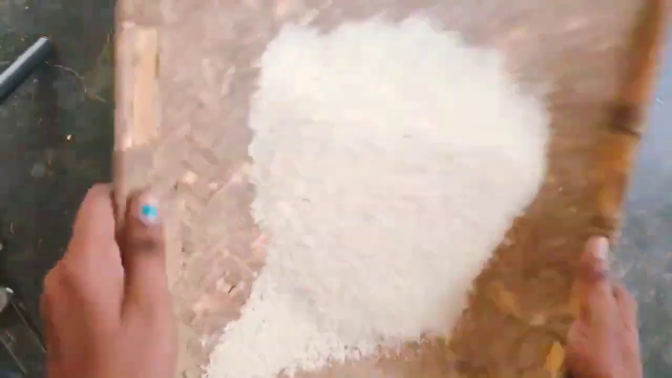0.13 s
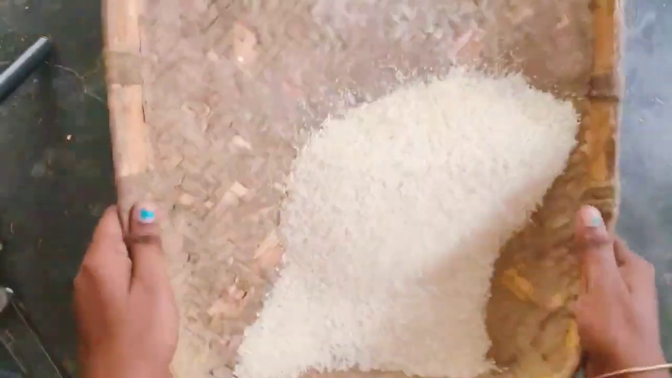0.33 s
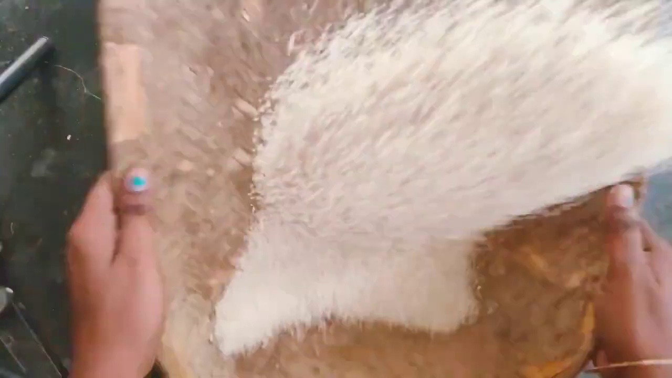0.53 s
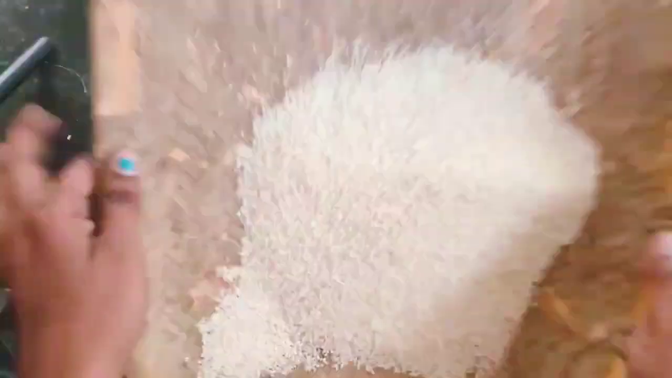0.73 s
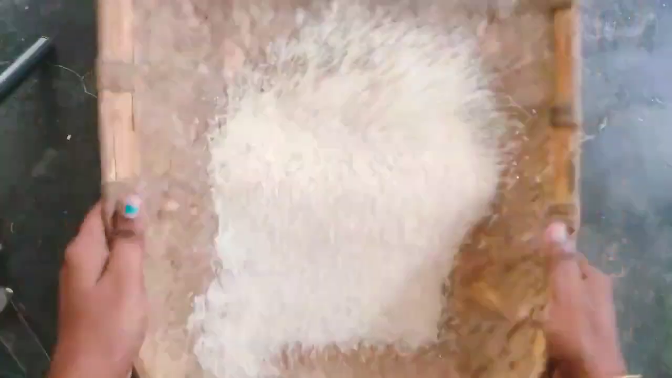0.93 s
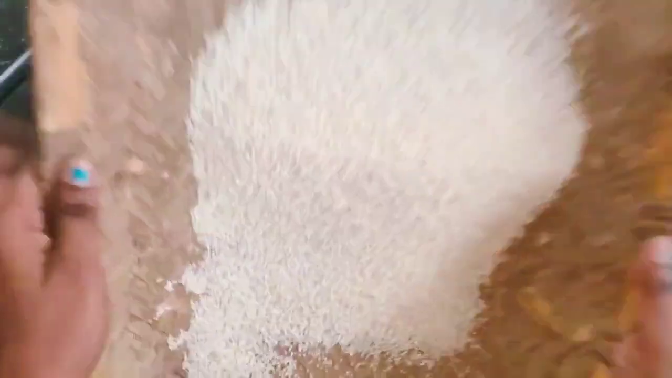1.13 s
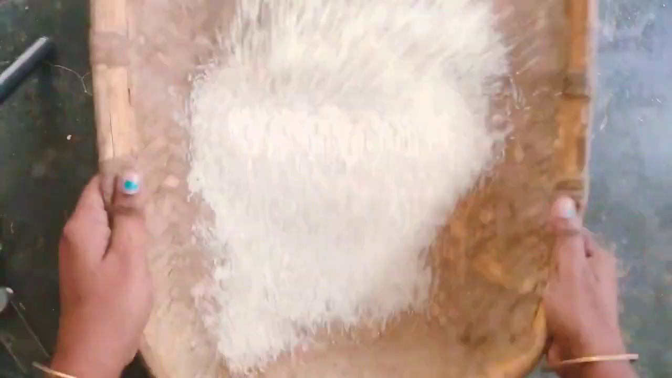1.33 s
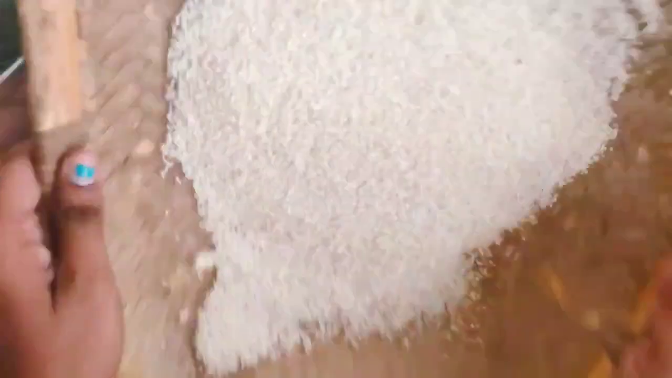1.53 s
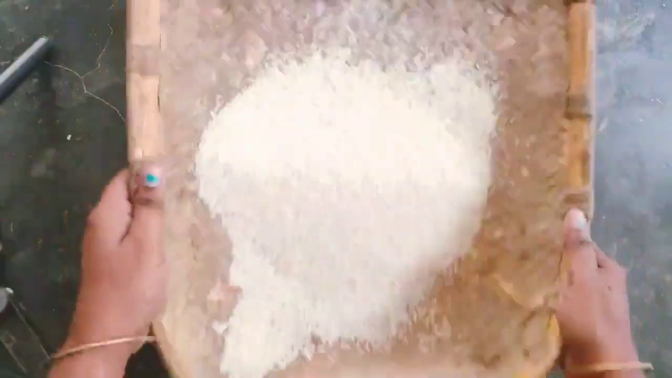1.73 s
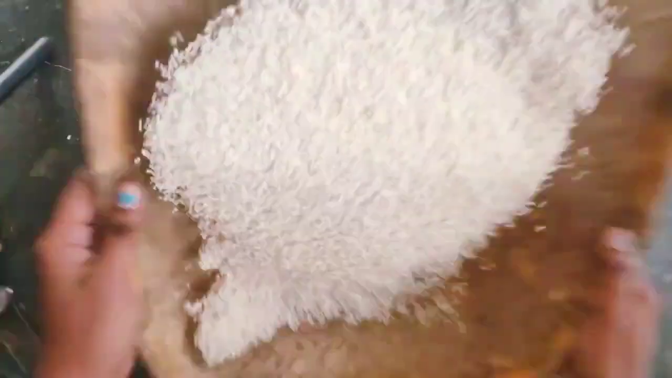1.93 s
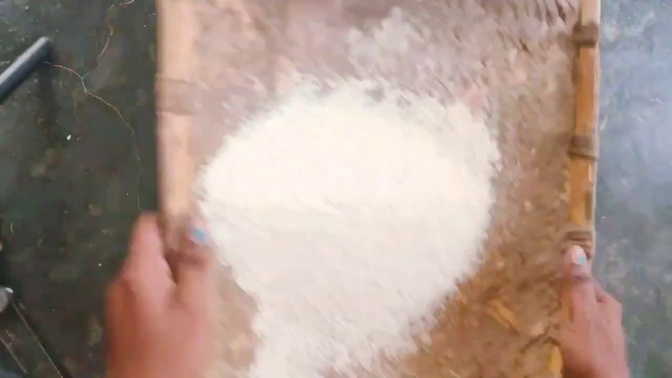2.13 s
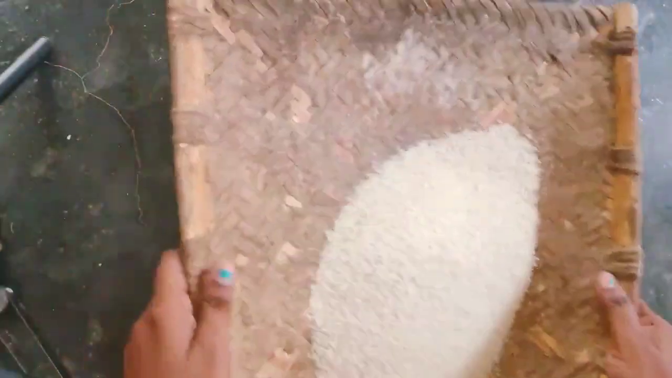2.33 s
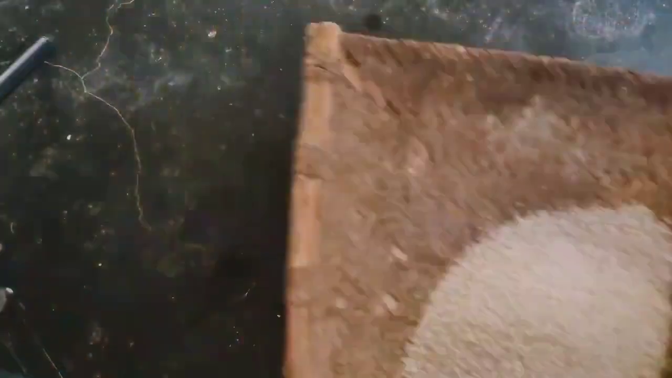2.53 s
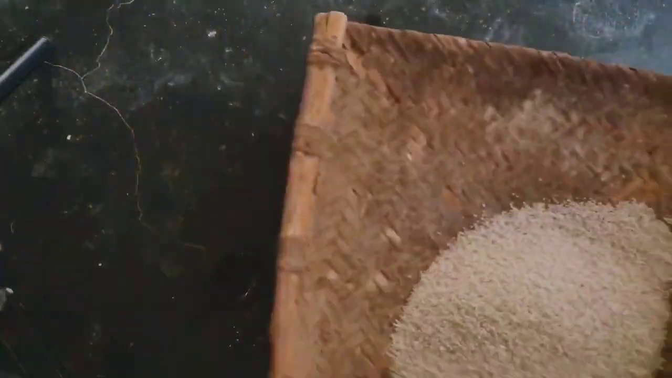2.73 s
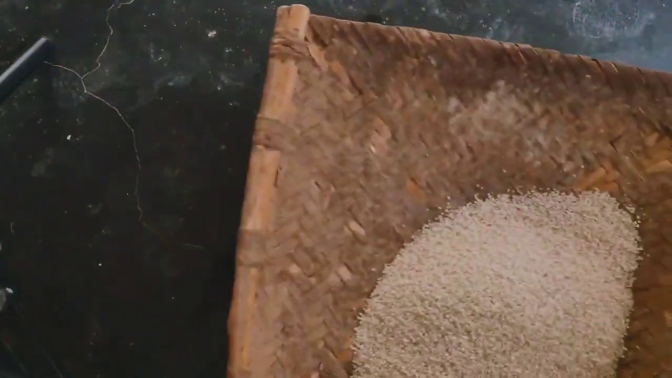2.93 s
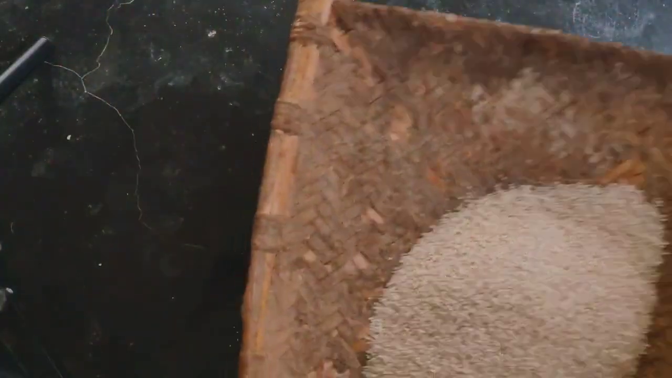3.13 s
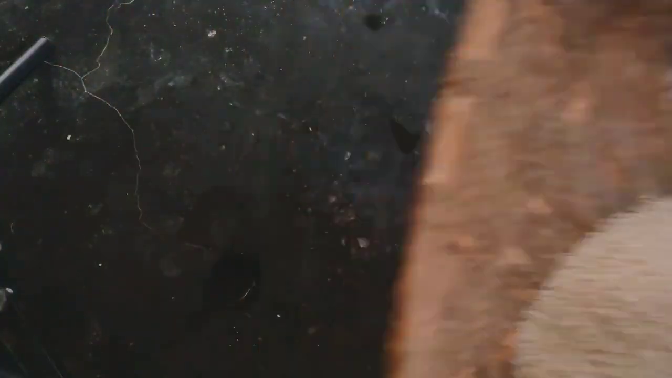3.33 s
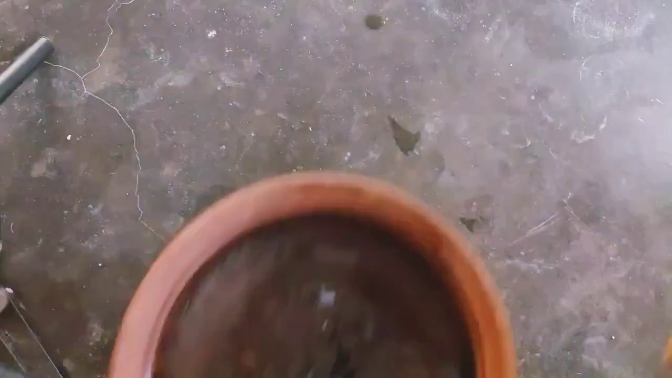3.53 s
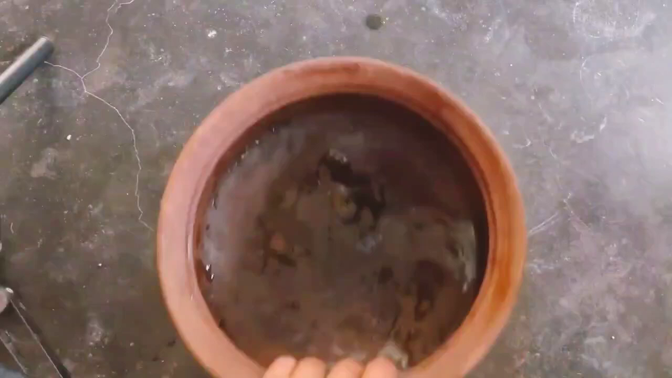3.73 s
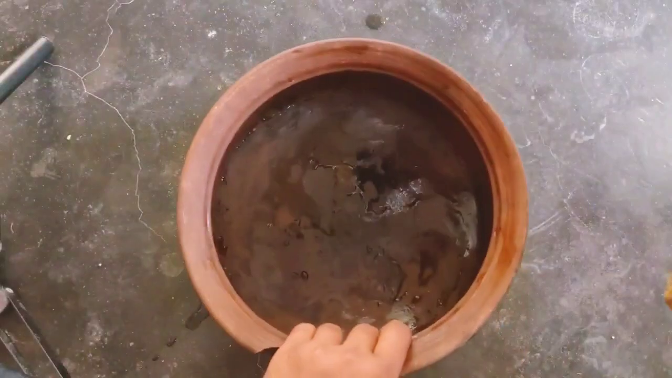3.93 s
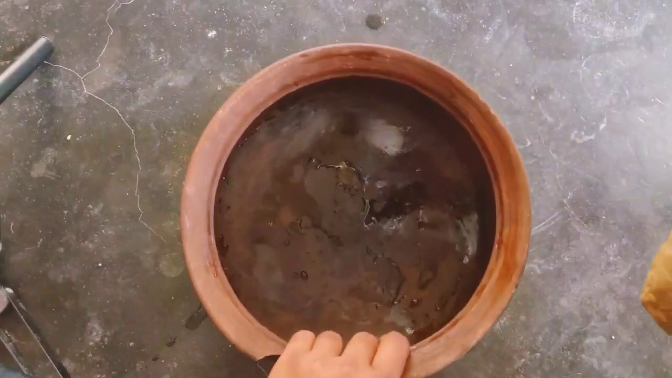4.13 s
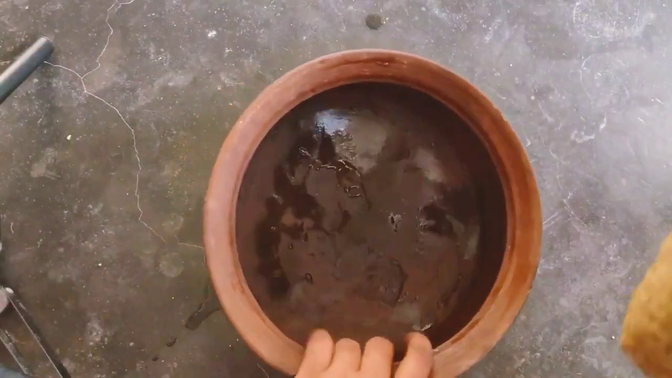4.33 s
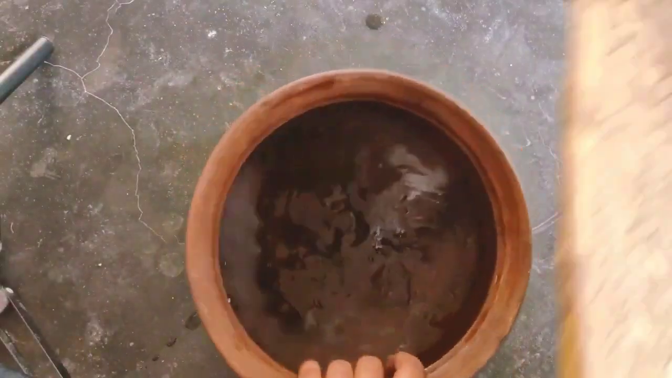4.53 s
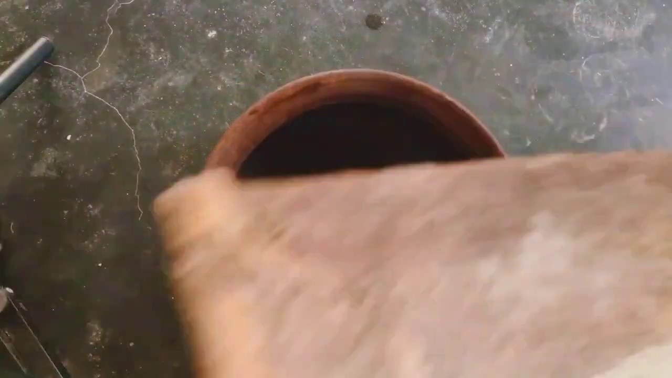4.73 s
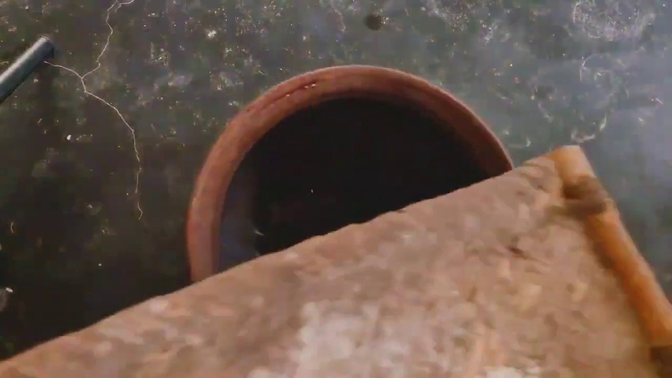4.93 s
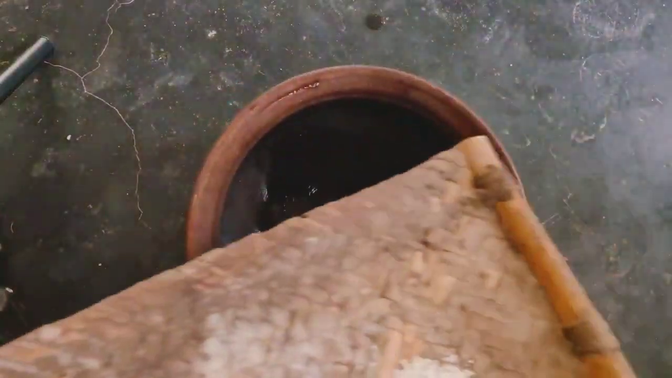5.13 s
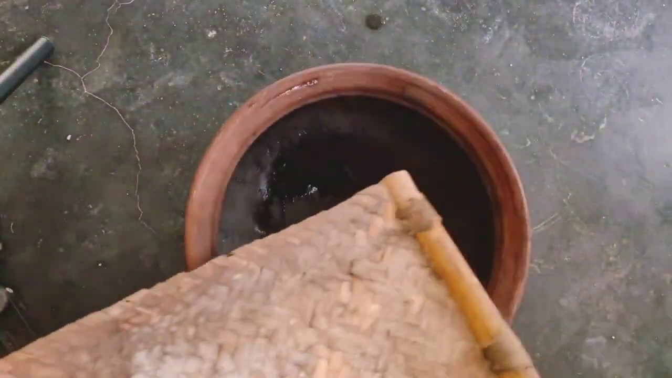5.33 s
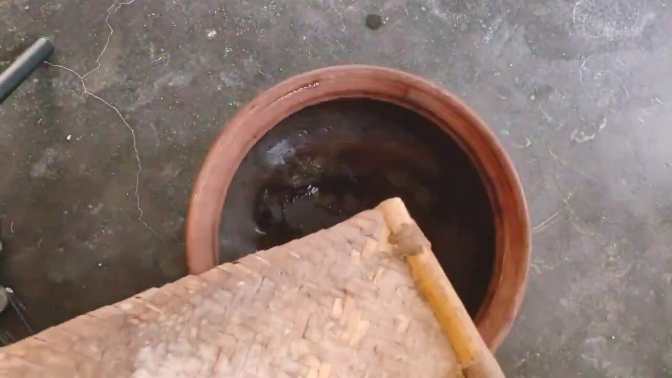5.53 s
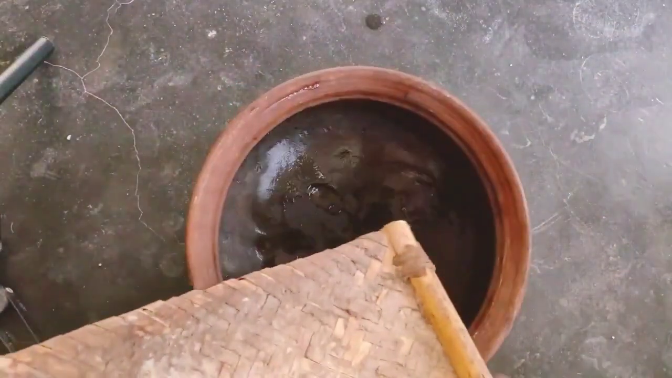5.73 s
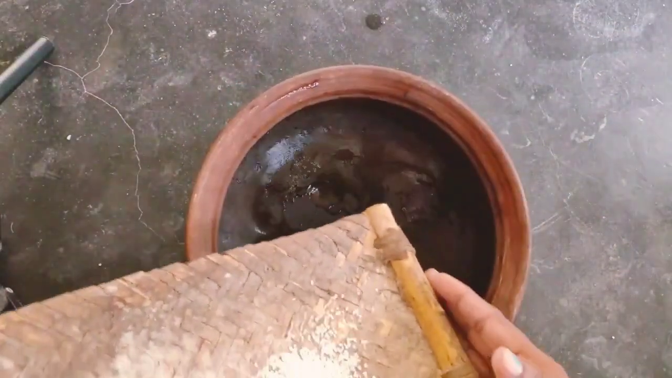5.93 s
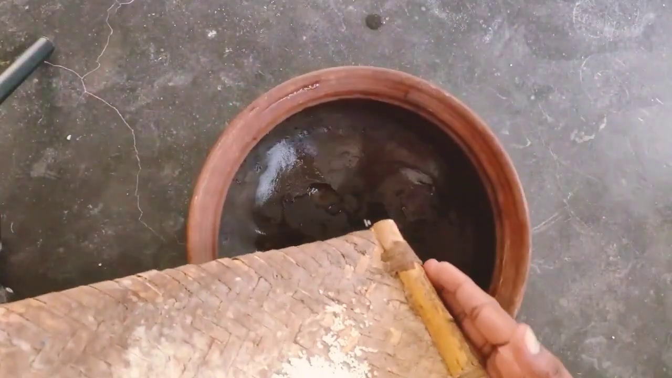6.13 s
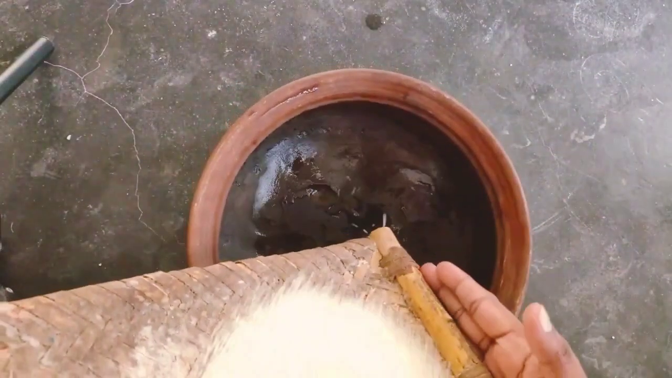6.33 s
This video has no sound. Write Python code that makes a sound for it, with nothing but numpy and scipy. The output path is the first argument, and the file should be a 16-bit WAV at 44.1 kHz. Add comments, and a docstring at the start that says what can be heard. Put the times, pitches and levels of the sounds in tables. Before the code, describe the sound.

Close stereo sound in a small room with short reflections, over a soft distant rush and low rumble. From 0 to 2.4 s rice is tossed on a woven bamboo tray: eight dense, bright swishes about 0.35 s apart, each a tenth of a second or so, with scattered trailing grains. Sharp, crackling mat snaps, often doubled, come at 0.02, 0.98, 1.34, 1.72 and 2.08 s. Then quiet. At 2.95-3.25 s the tray flexes with soft bumps, a low gust and stray clicks. One thin, plunging bird chirp sounds at 3.65 s. At 4.02 s a clay pot knocks the floor, thudding, briefly ringing and rocking on grit until 4.15. From 3.93 s a bird calls around 2.5 kHz, about five times a second; very faint low hoots join after 5.4. Grain slips softly at 4.66, 5.66 and 5.92 with light hand bumps, then from 6.17 s a growing slide runs to the end.

```python
"""In a room with birds outside, rice is winnowed on a woven bamboo tray.
The mat snaps: a push and pull of air, with rings and crackle. The grain lands as countless tiny hits.
A clay pot of water is set on the floor, made of dying modes and grit; then grain slides down the tilted tray.
Outside, gliding tones make one falling chirp, a long series of calls and some far hoots.
A distant rush and a low rumble are coloured noise."""
import sys
import numpy as np
from scipy import signal
from scipy.fft import rfft, irfft
from scipy.io import wavfile
from scipy.ndimage import uniform_filter1d

SR = 44100
rng = np.random.default_rng(int(sys.argv[2]) if len(sys.argv) > 2 else 0)


def transcribe(u):
    """Save the signal u as a 16-bit wav file named by the first command-line argument.

    u: samples, shape (n,) or (channels, n), limited to [-1, 1]; the rate is SR.
    q: integer samples, one column per channel.
    """
    v = np.clip(np.atleast_2d(u).T, -1, 1)
    q = np.round(v * 32767).astype(np.int16)
    wavfile.write(sys.argv[1], SR, q)


N = 285768  # length in samples
HZ = np.fft.rfftfreq(N, 1 / SR)
TIME = np.arange(N) / SR  # seconds
RING = np.arange(SR // 2) / SR  # time within one short sound, seconds

# Snaps of the mat. Each row: time of the push in seconds, relative peak in dB, width of the push in ms.
MAT_SNAPS = [(0.0233, -14, 0.31), (0.0281, -27.5, 1.5), (0.973, -10.5, 0.29), (0.9812, -4.5, 0.1),
             (0.9893, -20.5, 0.34), (1.3370, -11.5, 0.34), (1.3457, -8, 0.29), (1.352, -31, 0.26),
             (1.363, -12.5, 0.43), (1.7158, -7.5, 0.17), (1.7336, -12.5, 0.34), (2.0764, -9.5, 0.23),
             (2.0821, -8.5, 0.28)]
# Ringing modes of the tray. Each row: average pitch in Hz, relative level in dB, time to fall 60 dB in seconds.
TRAY_MODES = [(121, -36.5, 0.24), (188.2, -19.5, 0.054), (236, -29.5, 0.059), (313, -26, 0.039),
              (353.3, -22, 0.18), (377.3, -26, 0.19), (438, -32.5, 0.14), (460, -30.5, 0.18),
              (648, -45.5, 0.087), (694, -46, 0.066), (785, -23.5, 0.046)]
# Stereo balance of the grain. Each row: frequency in Hz, left over right in dB.
GRAIN_BALANCE = [(100, -4), (1300, 1), (1900, -5.5), (2800, 1.5), (4100, 0), (5700, 13), (8300, 7),
                 (11500, 5.5), (13500, 8.5), (15200, 57)]


def rice():
    """Tossed grain falls back in swishes; later it slides down the tray with a duller sound."""
    # Tossed grain landing. Each row: start in seconds, length of the fall in seconds,
    # rise in seconds, relative level in dB.
    tosses = [(0.016, 0.17, .02, -46), (0.316, 0.12, 0.027, -45), (0.654, 0.14, .011, -44),
              (1.017, 0.099, .016, -40), (1.377, .13, 0.015, -41), (1.753, 0.12, 0.022, -40.5),
              (2.103, 0.11, 0.018, -40.5), (2.318, 0.074, 0.046, -43.5)]
    # The heap slips as the tray is tilted. Each row: time of the peak in seconds, relative level in dB,
    # rise in seconds, fade in seconds.
    slip_rows = [(4.66, -69, 0.062, .17), (5.42, -85, 0.029, 0.035), (5.66, -73.5, 0.063, .07),
                 (5.92, -66.5, 0.14, 0.19)]
    stir_db, stir_fade_s = -42.5, 0.014  # each snap stirs the grain on the mat; dB relative to the snap
    pour_s, pour_db, pour_db_per_s = 6.165, -72.5, 61.5  # start, relative level at the start, growth

    falls = sum(landing(*toss) for toss in tosses)
    stirs = sum(amp(db + stir_db) * swell(s, rise_s=0.0027, fade_s=stir_fade_s) for s, db, _ in MAT_SNAPS)
    slips = sum(amp(db) * swell(s, rise_s, fade_s) for s, db, rise_s, fade_s in slip_rows)
    # at last the heap gives way and the flow keeps growing
    pour = amp(pour_db + pour_db_per_s * (TIME - pour_s)) * (TIME > pour_s)
    tossed = grain(np.hypot(falls, stirs), per_s=11000, size_db=0.0, clump_db=1.5)
    sliding = grain(np.hypot(slips, pour), per_s=14000, size_db=0.5, clump_db=0.4)
    return amp(6.5) * tossed + amp(11.0) * soften(sliding, top_hz=12900)


def landing(s, length, rise_s, db):
    """Flow of one toss: it builds up and holds; then the heap stops, loose grains roll and strays trickle."""
    stop_s, roll_s, stray_s = .014, 0.049, 0.095  # time constants
    roll_db, stray_db = -7, -29.5  # relative to the heap
    after = np.maximum(TIME - s - length, 0)
    heap = np.exp(-after / stop_s)
    rolling = amp(roll_db) * np.exp(-after / roll_s)
    strays = amp(stray_db) * np.exp(-after / stray_s)
    settle = heap + rolling + strays
    return amp(db) * np.clip((TIME - s) / rise_s, 0, 1) * settle / settle[0]


def grain(flow, per_s, size_db, clump_db):
    """Tiny impacts on the weave, landing in clumps; a thin flow breaks up into single grains."""
    # Colour of grain on bamboo. Each row: frequency in Hz, relative level in dB per Hz.
    grain_colour = [(60, -18), (150, -15.5), (450, -5), (800, 2), (1400, -1.5), (1900, -1.5), (2800, 0.5),
                    (4100, -6.5), (5700, -1), (8300, -9.5), (12200, -10.5), (14000, -6), (15200, -5.5)]
    # How alike left and right are. Each row: frequency in Hz, likeness from 0 to 1.
    grain_likeness = [(200, 0.92), (800, 0.93), (2000, 0.22), (4000, 0), (15000, 0)]
    wander = evened(uniform_filter1d(rng.standard_normal(N), size=350))
    clumps = amp(clump_db * wander)
    # per_s is the number of impacts per second on each side at the strongest flow
    chance = np.clip(per_s / SR * (flow / flow.max()) ** 0.57, 1e-3, 1)
    sizes = amp(size_db * np.minimum(rng.exponential(1, (2, N)), 4))
    sizes = sizes * rng.choice([-1., 1.], (2, N))
    struck = rng.random((2, N)) < chance
    # fewer hits are each made stronger, so the power follows the flow
    hits = evened(sizes) * struck / np.sqrt(chance) * flow * clumps
    left, other = colour(hits[0], grain_colour), colour(hits[1], grain_colour)
    return spread(left, other, grain_likeness, GRAIN_BALANCE)


def mat_pops(pull_ms=0.84, pull_length_ms=0.27, pull_share=0.93, ring_db=1.0):
    """Each snap pushes the air, then pulls it back; the strips crackle and the tray rings on."""
    # Stiff strips of the mat. Each row: average pitch in Hz, relative level in dB,
    # time to fall 60 dB in seconds.
    strip_modes = [(1450, -21, 0.018), (2050, -18.5, 0.013)]
    # Colour of the crackle. Each row: frequency in Hz, relative level in dB.
    splinter_colour = [(300, 5), (1300, 3.5), (1700, -1), (2200, -5), (3000, -20.5), (4000, -18.5),
                       (5700, -10), (9000, -25), (12000, -30.5), (15000, -34)]
    crackle_db = -19.5  # relative to the snap, before colouring
    thumps, crackle = np.zeros((2, N))
    lead = .004  # seconds kept ahead of the push's peak
    ms = (RING - lead) * 1000
    for s, db, push_ms in MAT_SNAPS:
        push = np.exp(-(ms / push_ms) ** 2)
        # a slow push is followed by a later, longer pull
        length_ms = pull_length_ms + push_ms / 2
        pull_size = pull_share * np.sqrt(push_ms / length_ms)
        pull = pull_size * np.exp(-((ms - pull_ms - push_ms) / length_ms) ** 2)
        add(thumps, s - lead, amp(db) * (push - pull))
        add(thumps, s, amp(db + ring_db) * ring(TRAY_MODES, detune=0.025, rise_s=0.0012))
        add(thumps, s, amp(db) * ring(strip_modes, detune=0.029, rise_s=0.00024))
        add(crackle, s - .0004, amp(db + crackle_db) * burst(t60=0.021))
    splinters = room(amp(5.5) * colour(crackle, splinter_colour), wet_db=-8.5, left_db=-0.5)
    # the splinters get the same left-right balance as the grain
    splinters = irfft(rfft(splinters) * sides(read(GRAIN_BALANCE, HZ)), N)
    return from_left(room(thumps, wet_db=-13.5, left_db=-2.0), lag_ms=0.11) + splinters


def tray_ticks():
    """Stray grains click on the weave as noise bursts; the tray's modes ring softly as it flexes."""
    # Stray grains hitting the weave. Each row: start in seconds, relative level in dB.
    tick_rows = [(0.599, -42), (0.912, -53), (1.247, -42), (1.294, -34), (1.612, -46), (1.659, -39),
                 (3.05, -35.5), (3.074, -39), (3.248, -46.5)]
    # The tray flexes as it is moved aside. Each row: start in seconds, relative level in dB.
    flex_rows = [(2.952, -32), (3.05, -38), (3.072, -24.5)]
    clicks, body = np.zeros((2, N))
    for s, db in tick_rows:
        add(clicks, s, amp(db) * burst(t60=0.015))
    for s, db in flex_rows:
        add(body, s, amp(db) * ring(TRAY_MODES, detune=.03, rise_s=0.0042))
    # frequency in Hz, relative level in dB
    sharp = colour(clicks, [(500, 14.5), (2500, 5.0), (4000, 1.5), (5600, 10.0), (9000, -6), (15000, -12.0)])
    low = room(body, wet_db=-6, left_db=-2)
    return room(amp(-9.5) * sharp, wet_db=-0.5, left_db=13) + low


def hand_taps():
    """Soft, dead bumps of the hands on the tray: short noise bursts with the treble taken off."""
    # Bumps. Each row: start in seconds, relative level in dB, low-pass corner in Hz.
    bump_rows = [(0.653, -31, 130), (3.022, -36, 200), (3.076, -30.5, 328), (4.672, -39, 200),
                 (5.778, -36.5, 2500), (5.919, -38, 600), (5.993, -32, 2500)]
    # Colour of a bump. Each row: frequency in Hz, relative level in dB.
    bump_colour = [(60, -3), (130, -3.5), (280, 3.5), (600, 4.5), (950, 4.5), (1300, -18), (4000, -20),
                   (15000, -34)]
    bumps = np.zeros(N)
    for s, db, top_hz in bump_rows:
        add(bumps, s, amp(db) * soften(burst(t60=0.029), top_hz))
    return room(amp(-1) * colour(bumps, bump_colour), wet_db=-10.0, left_db=-3.5)


def pot():
    """The pot meets the floor and rocks: it thuds, its wall rings and its foot grinds on grit."""
    # Contacts with the floor. Each row: start in seconds, then relative levels in dB
    # of the thud, the wall's ring and the grit.
    knock_rows = [(4.0192, -28.5, -24.5, -46), (4.0263, -40, -26.5, -52), (4.034, -28.5, -45, -48),
                  (4.05, -50, -33.5, -47), (4.08, -41.5, -33, -39), (4.113, -64, -46, -49)]
    # The pot as a whole. Each row: average pitch in Hz, relative level in dB, time to fall 60 dB in seconds.
    thud_modes = [(110, -10, .16), (164, -5.5, 0.09), (228, -20.5, 0.11), (288, -8, 0.083),
                  (352, -3.5, 0.13), (424, -4, 0.12), (500, -9, 0.076)]
    # The pot's wall. Each row: average pitch in Hz, relative level in dB, time to fall 60 dB in seconds.
    wall_modes = [(1284, 1, 0.018), (1510, -21, 0.052), (1765, -19.5, 0.11), (1897, -6.5, 0.046),
                  (2050, -0.5, 0.036), (2160, -28, 0.04), (2530, -21, 0.06), (2686, -21.5, 0.064),
                  (3310, -29, .08)]
    # Colour of the grit. Each row: frequency in Hz, relative level in dB.
    grit_colour = [(200, -21), (1200, -1.5), (1900, 6), (3500, -10.5), (6500, -9), (10000, -35),
                   (15000, -25)]
    thud, wall, grit = np.zeros((3, N))
    for s, thud_db, wall_db, grit_db in knock_rows:
        add(thud, s, amp(thud_db) * ring(thud_modes, detune=0.0037, rise_s=0.00085))
        add(wall, s, amp(wall_db) * ring(wall_modes, detune=0.011, rise_s=0.0011))
        add(grit, s, amp(grit_db) * burst(t60=0.064))
    low = amp(0.5) * room(thud, wet_db=-8, left_db=-3)
    ringing = room(amp(1.5) * wall, wet_db=-10.5, left_db=-7.5)
    grinding = room(amp(0.5) * colour(grit, grit_colour), wet_db=-5.0, left_db=12)
    return low + ringing + grinding


def outside():
    """Birds and hoots from a distance: gliding tones heard mostly as reflections."""
    # The calling bird. Each row: start in seconds, length in seconds,
    # pitch in Hz before the call's arch and rasp lower it, relative level in dB.
    call_rows = [(3.927, 0.079, 2520, -56.5), (4.173, 0.059, 2585, -48), (4.411, 0.089, 2527, -44.5),
                 (4.624, 0.082, 2574, -43), (4.828, 0.089, 2596, -46), (5.018, 0.081, 2578, -45.5),
                 (5.203, 0.088, 2578, -44), (5.384, 0.089, 2580, -44.5), (5.565, 0.101, 2610, -42),
                 (5.761, 0.074, 2592, -42.5), (5.977, 0.075, 2568, -44), (6.228, 0.05, 2609, -44)]
    # Relative level in dB of each harmonic of a full-voiced call, lowest first.
    full_harmonics = [4, -16.5, -20.5, -37, -34]
    # Far hoots. Each row: start in seconds, length in seconds,
    # pitch in Hz before arch and rasp lower it, relative level in dB.
    hoot_rows = [(5.369, 0.075, 694, -57.5), (5.603, 0.055, 695, -51.5), (5.707, 0.065, 626, -61),
                 (5.889, 0.145, 617.5, -58), (6.051, 0.102, 566.5, -58)]
    full_hz, full_db = 2605, -41  # a call of full voice
    least_rasp, rasp_per_hz = .02, .00025  # lower calls are raspier
    overtone_rise = 0.63  # dB added to the overtones per dB that a call is weaker
    whistle, series, hoots = np.zeros((3, N))
    add(whistle, 3.651, amp(-43.0) * chirp())
    for s, length, hz, db in call_rows:
        first, *overtones = full_harmonics
        harmonics = [first] + [part + overtone_rise * (full_db - db) for part in overtones]
        rasp = least_rasp + rasp_per_hz * max(full_hz - hz, 0)
        add(series, s, amp(db) * call(length, hz, harmonics, arch=0.03194, rough=rasp))
    for s, length, hz, db in hoot_rows:
        add(hoots, s, amp(db) * call(length, hz, [0, -12], arch=0.016, rough=0.0398))
    far_whistle = room(whistle, wet_db=8, left_db=12, stretch=0.78)
    far_series = room(amp(-3.0) * series, wet_db=1.5, left_db=6.5, stretch=1.32)
    return far_whistle + far_series + room(hoots, wet_db=0.5, left_db=-0.5, stretch=3.5)


def chirp(loud_s=0.0081, width_s=.009, trail_db=-22, trail_s=0.24, rough=0.013):
    """A whistle that plunges in pitch: loud near the top, then a faint trail."""
    from_hz, to_hz, fall_s = 6220, 2420, .037  # first pitch, pitch approached, time constant
    t = RING[:SR // 8]
    hz = to_hz + (from_hz - to_hz) * np.exp(-t / fall_s)
    hz = hz * (1 + rough * evened(uniform_filter1d(rng.standard_normal(len(t)), size=60)))
    loudness = np.exp(-((t - loud_s) / width_s) ** 2) + amp(trail_db) * np.exp(-t / trail_s)
    tone = np.sin(2 * np.pi * np.cumsum(hz) / SR)
    return loudness * signal.windows.tukey(len(t), .03) * tone


def call(length, hz, harmonics_db, arch, rough):
    """A call whose pitch arches up and back, while the voice keeps slipping down in a quick rasp."""
    u = np.linspace(-1, 1, int(length * SR))
    shake = evened(uniform_filter1d(rng.standard_normal(SR), size=130))[:len(u)]
    # about half of the time there is no slip, which leaves a clear line above the rasp
    slip = 2 * np.maximum(shake, 0)
    pitch = hz * (1 - arch * (1 + u ** 2) / 2 - rough * slip)
    turns = np.cumsum(pitch) / SR
    voice = sum(amp(db) * np.sin(2 * np.pi * k * turns) for k, db in enumerate(harmonics_db, 1))
    return evened(voice * signal.windows.tukey(len(u), .5))


def air():
    """A distant rush over a low rumble, both coloured noise; they sink slowly and come back quickly."""
    # Colour of the rush. Each row: frequency in Hz, relative level in dB per Hz.
    rush_colour = [(30, -23.5), (200, -12.5), (360, -9.5), (560, -11), (950, -5), (1150, -4), (1480, 2),
                   (1850, -6.5), (2300, -9.5), (2900, -15), (3900, -31), (5700, -28), (9000, -36),
                   (15000, -35.5)]
    # Stereo balance of the rush. Each row: frequency in Hz, left over right in dB.
    rush_balance = [(100, 11), (380, -6), (600, -2), (950, -17), (1400, -20.5), (1900, -16), (2800, -12),
                    (4000, -1), (5700, 5.5), (9000, -0.5), (15000, 1)]
    # How alike left and right are. Each row: frequency in Hz, likeness from 0 to 1.
    rush_likeness = [(100, 0.44), (300, 0.72), (640, 0.054), (15000, 0)]
    # Colour of the rumble. Each row: frequency in Hz, relative level in dB per Hz.
    rumble_colour = [(8, -12), (22, -0.5), (45, -3), (70, -5.5), (110, -14), (180, -22), (400, -57),
                     (2000, -86)]
    # The rumble swells when the tray is swung. Each row: time of the peak in seconds, level in dB,
    # rise in seconds, fade in seconds.
    swing_rows = [(1.3, -52.5, .9, .8), (3.055, -42.5, 0.031, 0.066), (4.7, -53, 0.21, 0.29)]
    rush_db, rumble_db = -52.5, -56  # levels away from the dip and the swings
    a, b, c = rng.standard_normal((3, N))
    left, other = colour(a, rush_colour), colour(b, rush_colour)
    rush = amp(rush_db) * spread(left, other, rush_likeness, rush_balance)
    swings = sum(amp(db) * swell(s, rise_s, fade_s) for s, db, rise_s, fade_s in swing_rows)
    rumble = np.hypot(amp(rumble_db), swings) * colour(c, rumble_colour) * sides(-1.9)
    dip = amp(-5.5 * swell(3.99, rise_s=0.6, fade_s=0.042))  # lowest at 3.99 s, by 5.5 dB
    return dip * (rush + rumble)


def burst(t60):
    """A quickly dying rattle of noise; t60 is the time to fall 60 dB, in seconds."""
    return rng.standard_normal(len(RING)) * amp(-60 * RING / t60)


def ring(modes, detune, rise_s):
    """Dying modes that build up during the contact; each blow shifts their pitches a little."""
    shake = np.zeros(len(RING))
    for hz, db, t60 in modes:
        shifted_hz = hz * (1 + detune * rng.standard_normal())
        tone = np.sin(2 * np.pi * (shifted_hz * RING + rng.random()))
        shake += amp(db - 60 * RING / t60) * tone
    return shake * (1 - np.exp(-RING / rise_s))


def swell(s, rise_s, fade_s):
    """Grows exponentially to 1 at time s, then dies away."""
    return np.exp(-np.maximum((s - TIME) / rise_s, (TIME - s) / fade_s))


def soften(x, top_hz):
    """Gentle low-pass: a softer contact."""
    return signal.sosfilt(signal.butter(2, min(top_hz, SR / 2.2), fs=SR, output="sos"), x)


def colour(x, spectrum):
    """Causal filter of unit power gain with the given spectrum."""
    gain = evened(amp(read(spectrum, abs(np.fft.fftfreq(4096, 1 / SR)))))
    # minimum phase: the response starts at once
    taps = np.fft.ifft(np.exp(np.conj(signal.hilbert(np.log(gain))))).real
    return signal.oaconvolve(x, taps[:len(taps) // 2])[:N]


def room(x, wet_db, left_db, stretch=0.54):
    """Direct sound plus dense reflections that die band by band; their bass is alike on both sides."""
    # Decay of the reflections. Each row: frequency in Hz, time to fall 60 dB in seconds before stretching.
    decay_times = [(100, 0.48), (500, 0.3), (2000, 0.4), (6000, 0.27), (15000, 0.19)]
    signs = rng.choice([-1., 1.], (2, SR))
    # sparse random echoes from 4 ms on
    taps = signs * (rng.random((2, SR)) < .08) * (np.arange(SR) > .004 * SR)
    hz, t, z = signal.stft(taps, SR, nperseg=256)
    same = np.exp(-hz / 1800)[:, None]
    z[1] = same * z[0] + np.sqrt(1 - same ** 2) * z[1]
    t60 = stretch * read(decay_times, hz)[:, None]
    tail = signal.istft(z * amp(-60 * t / t60), SR, nperseg=256)[1]
    wet = signal.fftconvolve(x[None], tail / np.linalg.norm(tail[0]), axes=1)[:, :N]
    return (x + amp(wet_db) * wet) * sides(left_db) / np.sqrt(1 + amp(2 * wet_db))


def spread(a, b, likeness, balance):
    """Two unrelated sounds become a partly alike left and right."""
    same = np.clip(read(likeness, HZ), -1, 1)
    a, b = rfft(a), rfft(b)
    right = same * a + np.sqrt(1 - same ** 2) * b
    return irfft(np.array([a, right]) * sides(read(balance, HZ)), N)


def from_left(x, lag_ms):
    """The sound reaches the right side a little later."""
    return np.array([x[0], np.interp(TIME - lag_ms / 1000, TIME, x[1])])


def sides(left_db):
    """Left and right gains whose mean is 1."""
    gains = amp(np.array([[.5], [-.5]]) * left_db)
    return gains / gains.mean(0)


def add(mix, s, sound):
    """Mixes a sound in at time s, in seconds."""
    part = mix[max(round(s * SR), 0):][:len(sound)]
    part += sound[:len(part)]


def read(points, hz):
    """Reads a table on a log-frequency axis."""
    f, value = np.transpose(points)
    return np.interp(np.log(hz + 1), np.log(f + 1), value)


def evened(x):
    """Scales to an rms (average strength) of 1."""
    return x / np.sqrt(np.mean(x ** 2) + 1e-20)


def amp(db):
    """Decibels to gain."""
    return 10 ** (np.asarray(db) / 20)


def scene():
    """Grain, tray, pot and surroundings together."""
    return rice() + mat_pops() + tray_ticks() + hand_taps() + pot() + outside() + air()


def record(dry):
    """A steep low-pass limits the treble."""
    edge_hz = 15620
    low_pass = signal.firwin(511, edge_hz, window=("kaiser", 9), fs=SR)
    return signal.oaconvolve(dry, low_pass[None], "same")


dry = scene()
out = record(dry)
transcribe(out)
```